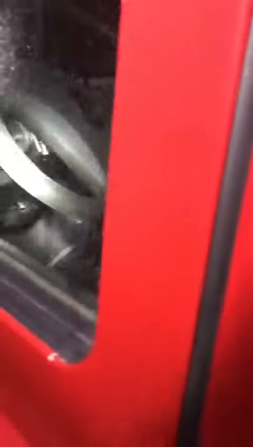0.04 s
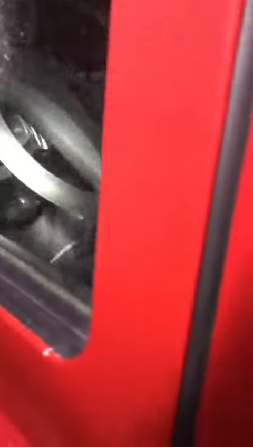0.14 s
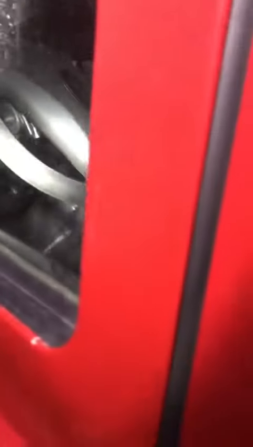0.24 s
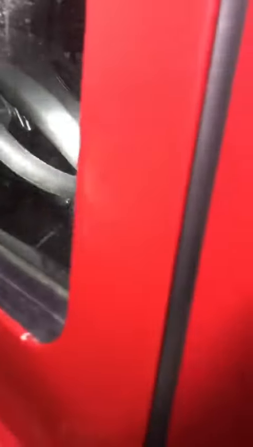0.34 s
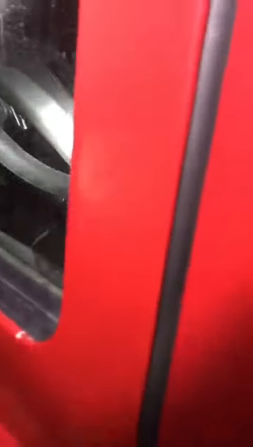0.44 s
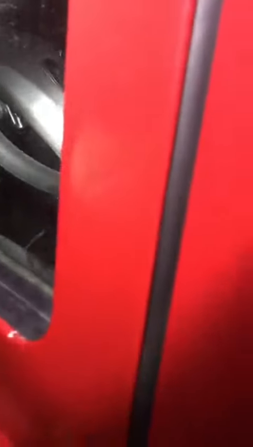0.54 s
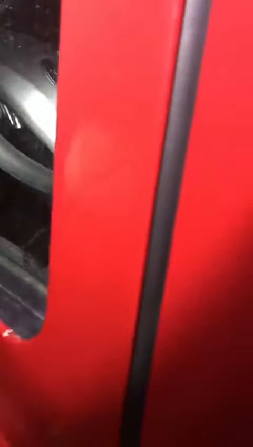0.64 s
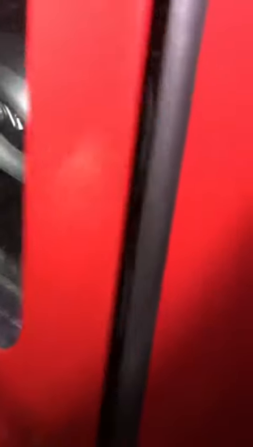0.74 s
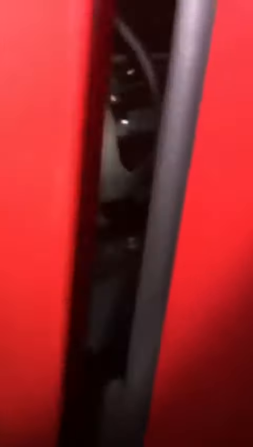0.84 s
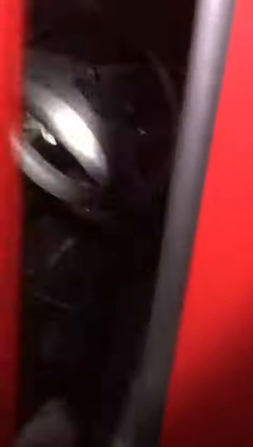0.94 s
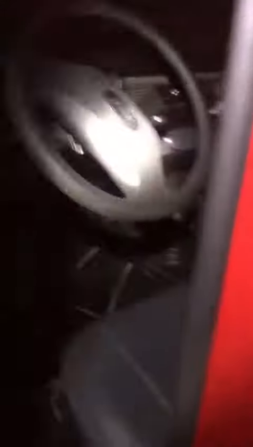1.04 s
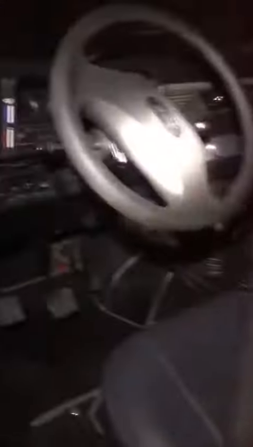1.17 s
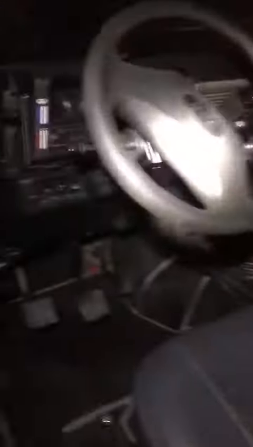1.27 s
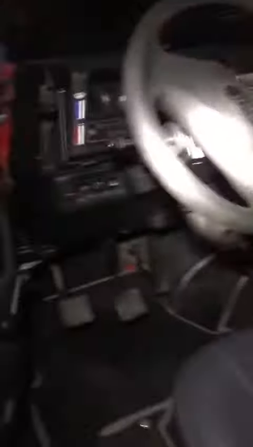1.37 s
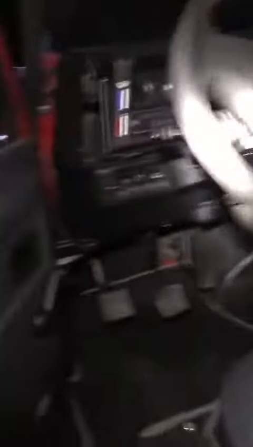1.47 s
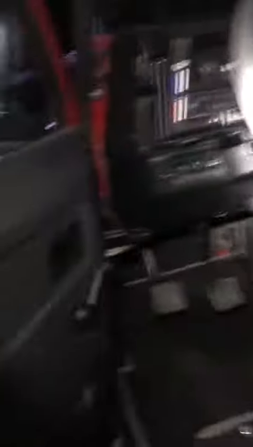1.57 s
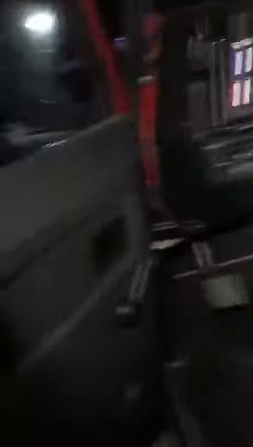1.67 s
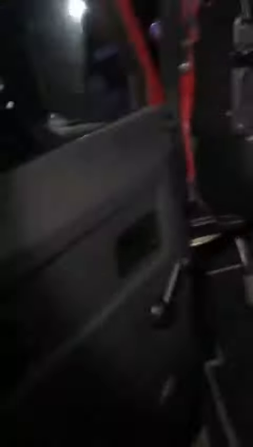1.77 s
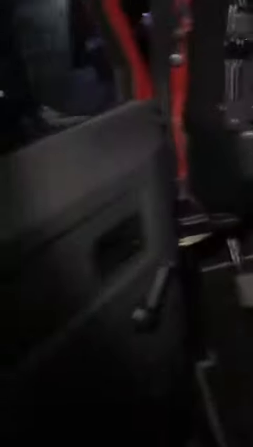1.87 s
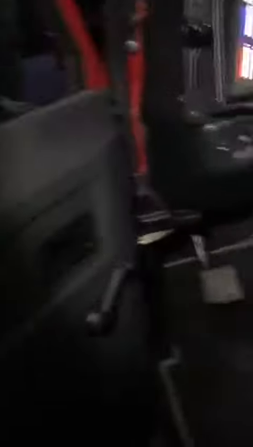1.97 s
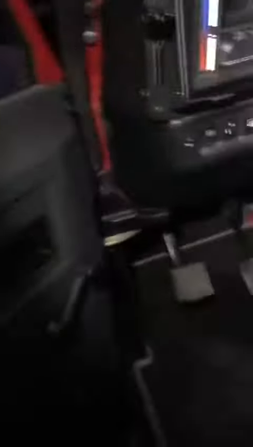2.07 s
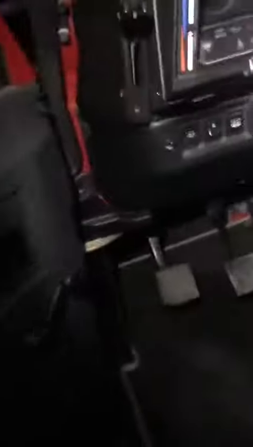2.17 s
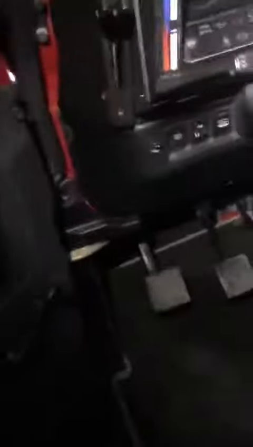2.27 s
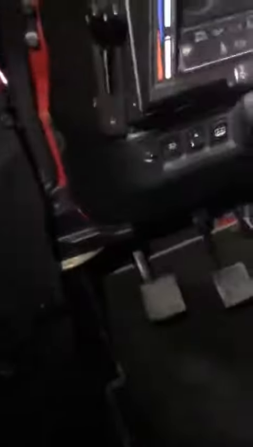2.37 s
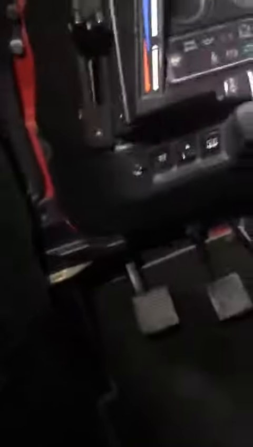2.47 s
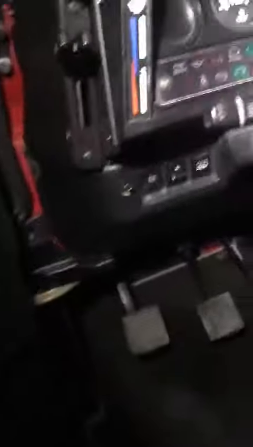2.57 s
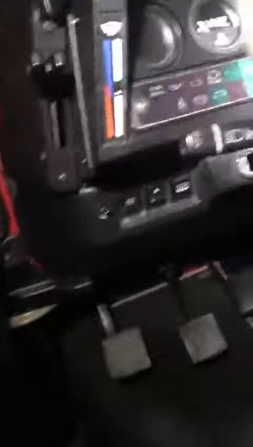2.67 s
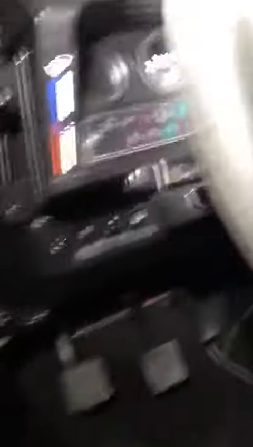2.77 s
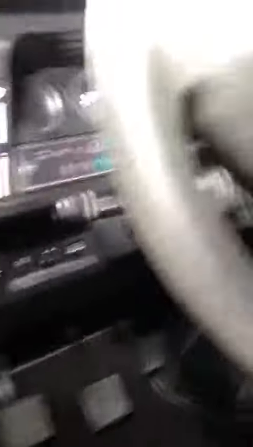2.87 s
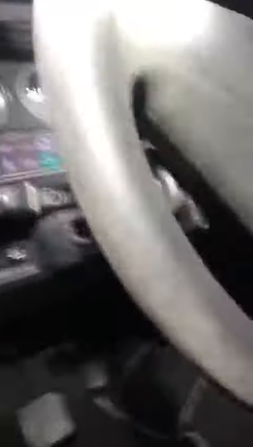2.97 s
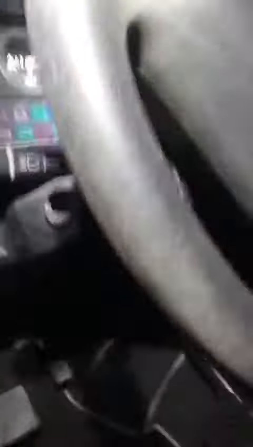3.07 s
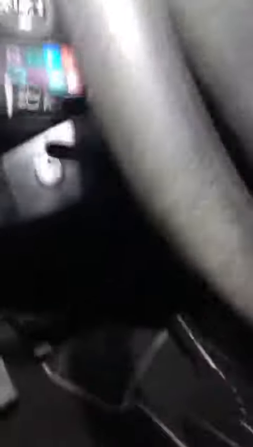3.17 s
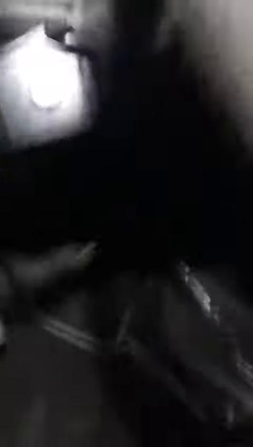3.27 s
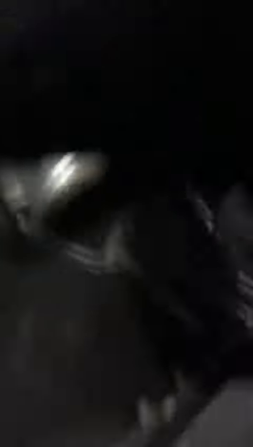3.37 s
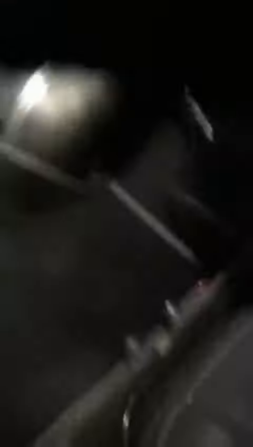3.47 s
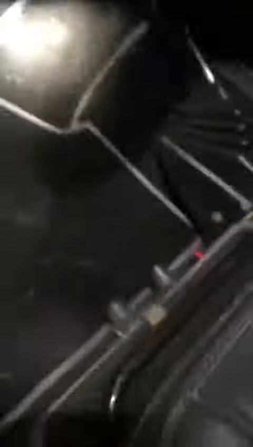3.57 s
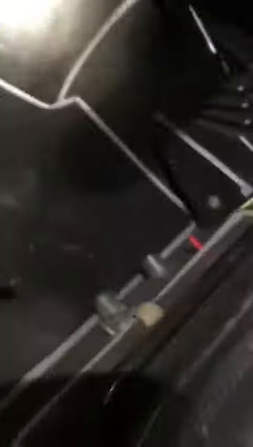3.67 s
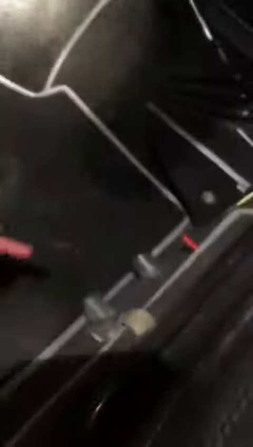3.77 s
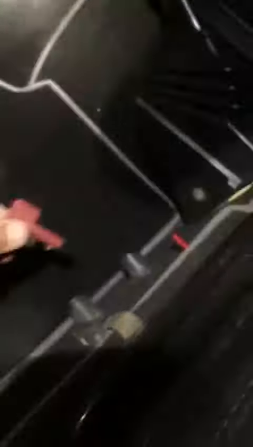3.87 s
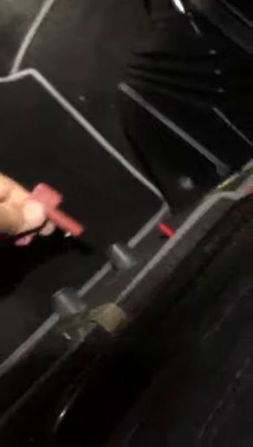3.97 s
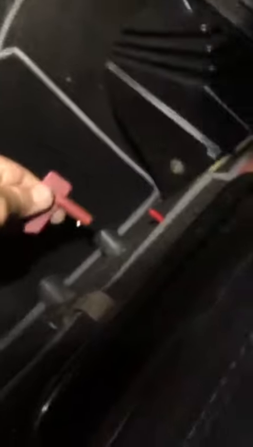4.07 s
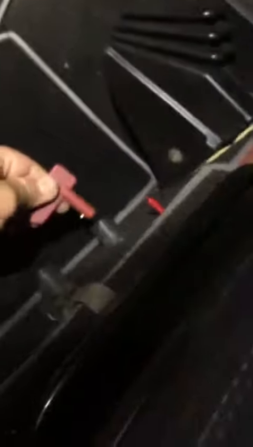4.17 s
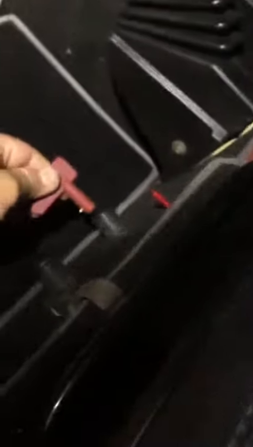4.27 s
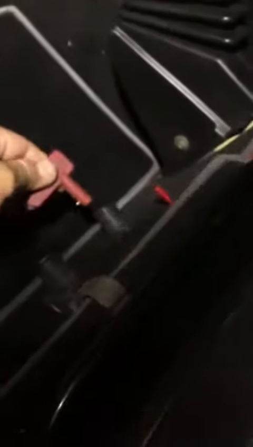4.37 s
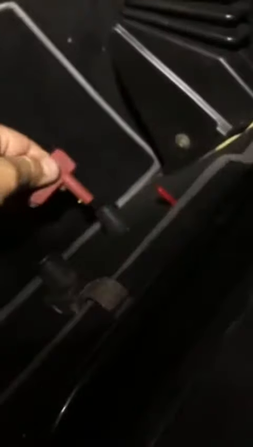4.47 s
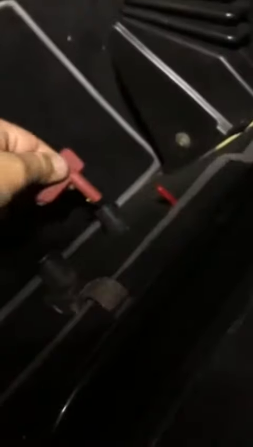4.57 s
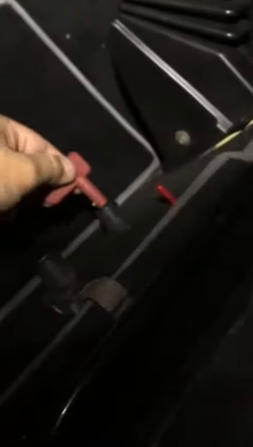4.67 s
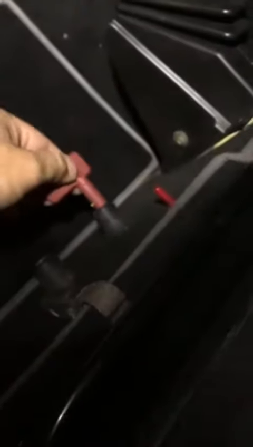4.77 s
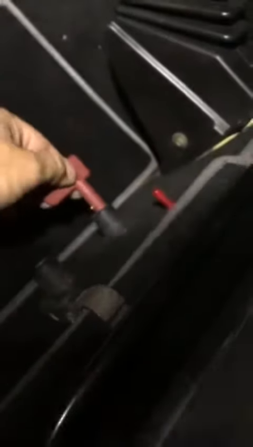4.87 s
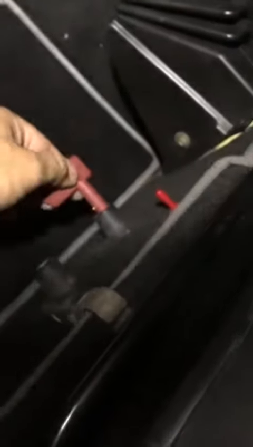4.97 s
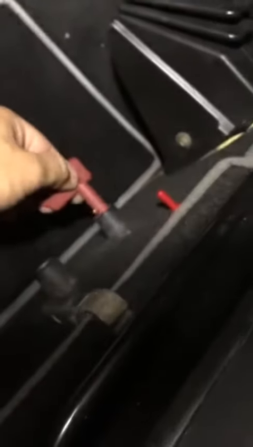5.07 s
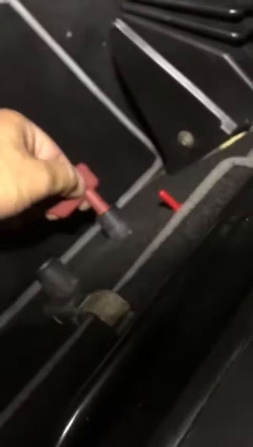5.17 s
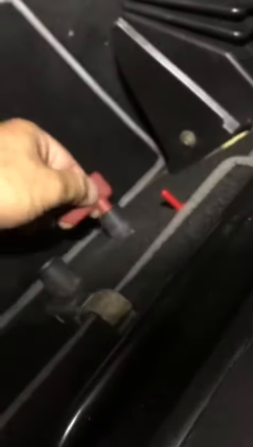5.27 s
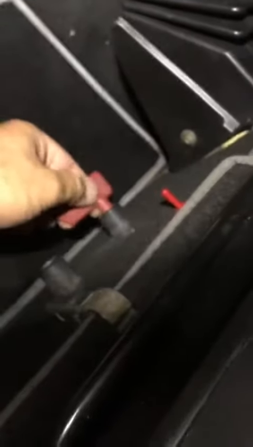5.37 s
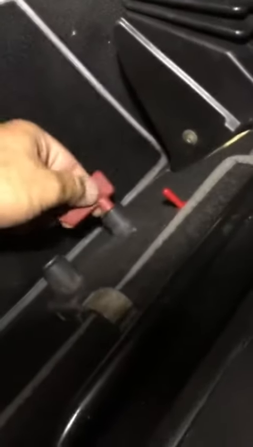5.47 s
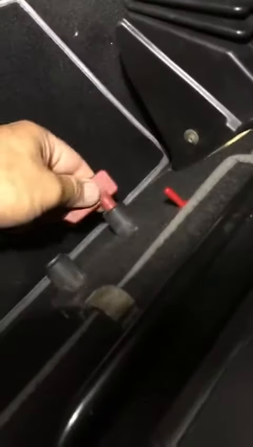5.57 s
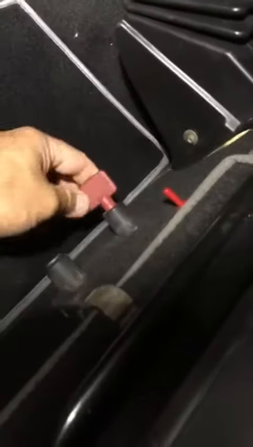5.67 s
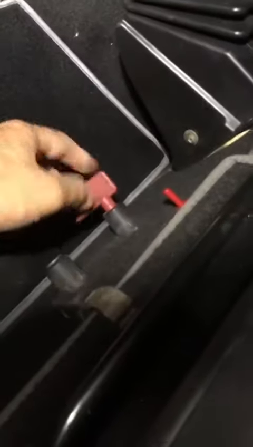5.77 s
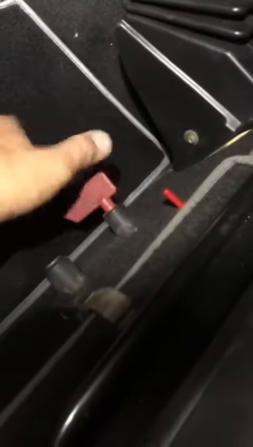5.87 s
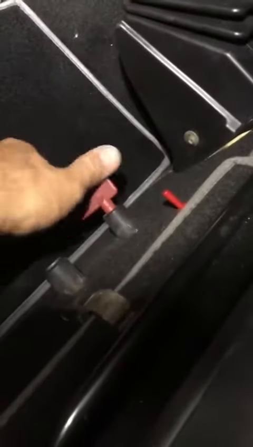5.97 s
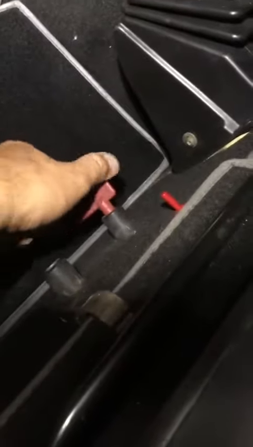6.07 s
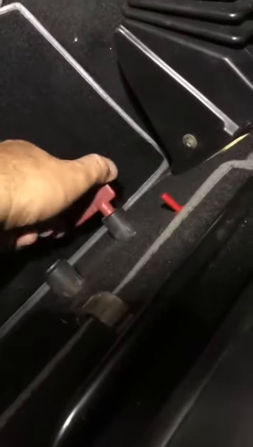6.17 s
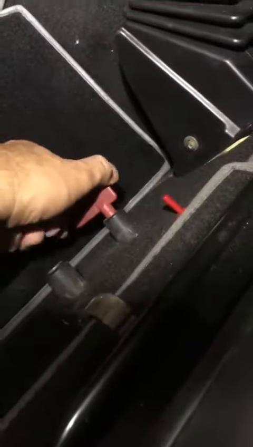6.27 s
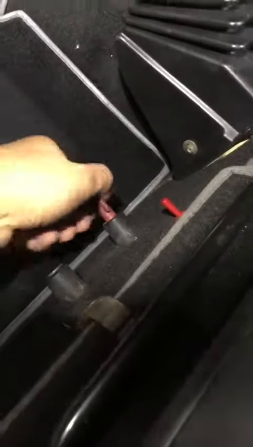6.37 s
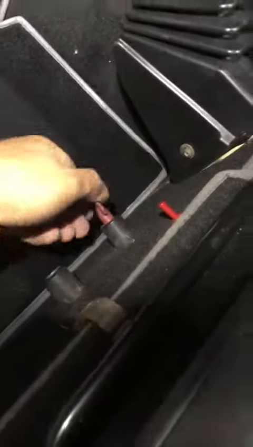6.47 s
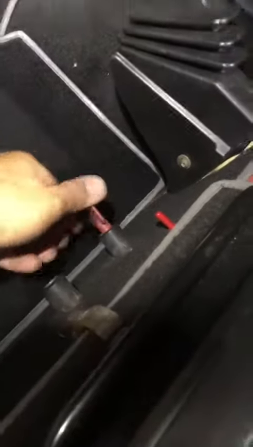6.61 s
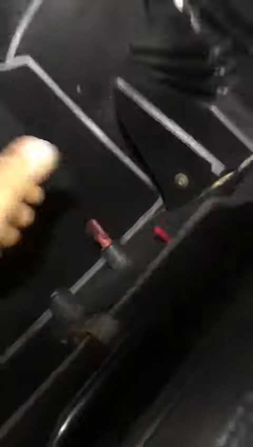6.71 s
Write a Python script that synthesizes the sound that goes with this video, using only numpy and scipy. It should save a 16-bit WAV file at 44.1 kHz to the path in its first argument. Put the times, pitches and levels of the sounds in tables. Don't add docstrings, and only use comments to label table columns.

```python
import sys
import numpy as np
from scipy import signal
from scipy.io import wavfile

SR = 44100
rng = np.random.default_rng(int(sys.argv[2]) if len(sys.argv) > 2 else 0)


def invert_db(x):
    u = np.asarray(x, float) / 20
    return 10 ** u


def to_wav(s):
    ch = np.atleast_2d(s).T
    pcm = np.round(np.clip(ch, -1, 1) * 32767)
    wavfile.write(sys.argv[1], SR, pcm.astype(np.int16))


N = 297278

EDGES = 28 * 2 ** (np.arange(28) / 3)
CENTRES = np.sqrt(EDGES[1:] * EDGES[:-1])


def rms_one(x):
    return x / np.sqrt(np.mean(x ** 2, axis=-1, keepdims=True) + 1e-20)


def at_hz(points, hz):
    f, db = np.transpose(points)
    return np.interp(np.log(hz), np.log(f), db, left=-90, right=-90)


def drift(rate_hz):
    r = np.exp(-80 * np.pi * rate_hz / SR)
    draws = rng.standard_normal(N // 40 + 2002)
    slow = signal.lfilter([1], [1, -2 * r, r * r], draws)[2000:]
    return np.interp(np.arange(N) / 40, np.arange(len(slow)), rms_one(slow))


def bands(source):
    split = []
    for k, (lo, hi) in enumerate(zip(EDGES, EDGES[1:])):
        band = signal.butter(2, [lo, hi], "band", fs=SR, output="sos")
        split.append(signal.sosfilt(band, source[k % 2]))
    return rms_one(np.array(split))


def grains(per_s, spread_db):
    sizes = invert_db(spread_db * np.minimum(rng.exponential(1, (2, N)), 5))
    signs = rng.choice([-1, 1], (2, N))
    happens = rng.random((2, N)) < per_s / SR
    return sizes * signs * happens + 1e-9


def ring(force, hz, t60):
    r = invert_db(-60 / (max(t60, .005) * SR))
    w = 2 * np.pi * hz / SR
    return signal.lfilter([0, np.sin(w)], [1, -2 * r * np.cos(w), r * r], force + 1e-18)


def add(track, s, piece):
    i = round(s * SR)
    track[..., i:i + piece.shape[-1]] += piece[..., :N - i]


def push(length_s):
    shape = np.hanning(max(round(length_s * SR), 3) + 2)
    return shape / shape.sum()


def swell(s, db, rise_db, fall_db):
    late = np.arange(N) / SR - s
    return invert_db(db + np.where(late < 0, rise_db * late, -fall_db * late)) ** 2


def layer(noise, spectrum, level_db, patchy_db):
    weight = invert_db(at_hz(spectrum, CENTRES)) * np.sqrt(CENTRES)
    flicker = [invert_db(patchy_db * drift(6.2)) for k in range(3)]
    mix = sum(w * flicker[k % 3] * band for k, (w, band) in enumerate(zip(weight, noise)))
    return invert_db(level_db) * rms_one(mix)


# (frequency [Hz], density [dB per Hz])
RUMBLE_SPECTRUM = [(15, -50), (25, -19.5), (69, -8), (108, -1.5), (176, -19.5), (195, -25.5), (321, -26.5),
                   (360, -17), (400, -23), (520, -58), (880, -120)]
# (frequency [Hz], density [dB per Hz])
TRAFFIC_SPECTRUM = [(100, -17.5), (170, 3), (216, 3.5), (399, -4.5), (936, 1), (1160, -10), (1290, -7.5),
                    (2020, -25.5), (3000, -24.5), (3900, -55.5), (6600, -120)]
# (frequency [Hz], density [dB per Hz])
TYRE_SPECTRUM = [(900, -19), (1300, 1), (1800, 1.5), (2200, -13.5), (3000, -30)]
# (frequency [Hz], density [dB per Hz])
RUSTLE_SPECTRUM = [(1060, -36.5), (1800, -4.5), (2300, -9), (5880, -10.5), (11100, -18), (12000, -23),
                   (12500, -37.5), (16200, -70), (22000, -120)]
# (time [s], traffic level [dB])
STREET_LEVEL = [(0, -52), (.25, -56), (1.3, -57), (1.6, -58.5), (2.6, -60.5), (3.0, -57), (3.45, -56),
                (3.8, -62.5), (4.5, -63.5), (5.5, -64), (6.2, -67), (6.74, -63)]
# (time [s], rustle level [dB])
RUSTLE_LEVEL = [(0, -71), (.45, -71), (0.849, -66.5), (1.16, -69.5), (1.5, -73), (1.76, -68.5), (2.27, -72),
                (2.7, -68.5), (2.97, -67.5), (3.26, -61), (3.651, -66.5), (3.94, -64), (4.13, -69.5),
                (4.56, -74), (6.381, -76), (6.74, -72.5)]
# (time of crest [s], level [dB])
CAB_ROCKINGS = [
    (.45, -54.5),
    (.9, -43.5),
    (1.25, -57),
    (3.11, -52.5),
    (3.501, -64),
    (4.13, -52),
    (5.29, -44),
    (6.45, -52),
]


def background(noise):
    t = np.arange(N) / SR
    street_db = np.interp(t, *np.transpose(STREET_LEVEL))
    rustle_db = np.interp(t, *np.transpose(RUSTLE_LEVEL))
    rocking = sum(swell(s, db, rise_db=69, fall_db=68) for s, db in CAB_ROCKINGS)
    rumble_db = 10 * np.log10(invert_db(-60.5) ** 2 + rocking)
    wash = swell(.84, -44.5, rise_db=80.5, fall_db=38)
    traffic_db = 10 * np.log10(invert_db(street_db) ** 2 + wash)
    hiss = layer(noise, RUSTLE_SPECTRUM, rustle_db, patchy_db=.6)
    rumble = layer(noise, RUMBLE_SPECTRUM, rumble_db, patchy_db=3.0)
    traffic = layer(noise, TRAFFIC_SPECTRUM, traffic_db, patchy_db=1.74)
    tyres = layer(noise, TYRE_SPECTRUM, -79.5, patchy_db=2.65)
    return rumble + traffic + tyres + hiss


# (time [s], length [s], rms level [dB])
RUBBER_STROKES = [(0.072, 0.1, -62), (0.546, 0.063, -61), (0.657, 0.044, -55.5), (0.73, 0.044, -39),
                  (0.8, 0.013, -31.5), (0.917, 0.094, -56.5), (1.026, 0.044, -58), (1.318, 0.024, -52),
                  (3.484, 0.11, -59.5), (5.211, 0.038, -65.5), (5.255, .055, -63.5)]
# (time [s], length [s], rms level [dB])
CLOTH_STROKES = [(1.695, 0.029, -60.5), (1.856, 0.058, -64.5), (1.816, 0.035, -69.5), (2.09, .05, -68.5),
                 (2.194, 0.012, -60.5), (2.496, 0.057, -49.5), (2.546, 0.032, -57), (2.744, 0.064, -55),
                 (2.867, 0.05, -64), (5.234, 0.089, -77), (5.638, 0.087, -67.5), (5.98, 0.045, -72.5),
                 (6.367, 0.05, -60), (6.522, .06, -75)]
# (time [s], length [s], rms level [dB], centre [Hz])
SOLE_DRAGS = [
    (0.12, 0.045, -54, 1100),
    (2.511, 0.041, -51.5, 843),
    (3.065, 0.2, -49.5, 328),
    (3.165, 0.083, -59, 874),
    (5.121, 0.032, -48, 1204),
    (6.381, 0.052, -57, 793),
]
# (time [s], length [s], rms level [dB], centre [Hz])
THIN_SLIDES = [
    (.11, .07, -71, 3700),
    (3.503, 0.07, -67, 2000),
    (5.22, .1, -72, 3470),
]


def scuffs(grit):
    out = np.zeros(N)
    t = np.arange(SR // 4) / SR
    rubs = [(*row, 3020, 1.5) for row in RUBBER_STROKES]
    rubs += [(*row, 5430, 1.42) for row in CLOTH_STROKES]
    rubs += [(*row, 0.86) for row in SOLE_DRAGS]
    rubs += [(*row, .3) for row in THIN_SLIDES]
    for s, length, db, hz, octaves in rubs:
        uneven_db = 2.0 * rng.standard_normal(len(CENTRES))
        colour = invert_db(-6 * (np.log2(CENTRES / hz) / octaves) ** 2 + uneven_db)
        stroke = np.minimum(t / 0.02, 1) * invert_db(-60 * np.maximum(t - length, 0) / 0.08)
        mix = colour / np.linalg.norm(colour) @ grit[:, round(s * SR):][:, :len(t)]
        add(out, s, invert_db(db) * stroke[:len(mix)] * mix)
    return invert_db(2.2 * drift(60)) * out


def cab(x):
    t = np.arange(SR // 2) / SR
    t60_s = 0.17
    tail = rng.standard_normal(len(t)) * invert_db(-60 * t / t60_s) * (t > .003)
    dull = signal.butter(2, [250, 2500], "band", fs=SR, output="sos")
    tail = signal.sosfilt(dull, tail)
    return invert_db(-22.5) * signal.fftconvolve(x, tail / np.linalg.norm(tail))[:N]


# (time [s], peak level [dB], frequency [Hz])
PAN_KNOCKS = [(0.085, -40.5, 126), (0.444, -39.5, 124), (1.074, -41, 167), (1.903, -41.5, 149),
              (2.166, -51, 129), (2.309, -42, 151.4), (4.222, -40.5, 129), (4.696, -31, 115.6),
              (5.131, -27.5, 122.3), (5.244, -27, 110.8), (5.31, -24.5, 129), (5.4, -42.5, 142.3),
              (5.683, -38, 137.2), (6.06, -46, 125.3), (6.389, -39.5, 117.2), (6.43, -38.5, 110),
              (6.557, -35, 112.8)]
# (time [s], peak level [dB], frequency [Hz])
SKIN_KNOCKS = [(0.593, -36, 254), (1.039, -35.5, 259.6), (1.14, -35.5, 228.4), (1.24, -36, 226),
               (1.287, -42, 240), (3.079, -36.5, 234), (3.147, -31.5, 267), (3.196, -34.5, 246),
               (3.231, -40.5, 214), (3.298, -38.5, 208), (3.841, -51, 256), (4.07, -38, 245.7),
               (5.725, -44.5, 281)]
# (time [s], peak level [dB], frequency [Hz])
KNUCKLE_KNOCKS = [
    (0.494, -48.5, 560),
    (2.045, -29.5, 538),
    (2.491, -48, 330),
    (2.861, -39.5, 597),
    (4.029, -34.5, 462),
]


def thuds():
    out = np.zeros(N)
    for rows, t60 in ((PAN_KNOCKS, 0.14), (SKIN_KNOCKS, 0.14), (KNUCKLE_KNOCKS, 0.028)):
        for s, db, hz in rows:
            force = np.zeros(SR // 3)
            add(force, 0, push(0.21 / hz))
            force = ring(force, hz, 2.7 / hz)
            near, high = rng.uniform([1.08, 1.7], [1.25, 2.4])
            body = ring(force, hz, t60)
            body += 0.45 * ring(force, near * hz, 1.147 * t60)
            body += .9 * ring(force, high * hz, 0.27 * t60)
            add(out, s, invert_db(db) * body / np.abs(body).max())
    return out


# (time [s], peak level at 1.5-4 kHz [dB], low part [dB rel], high part [dB rel])
DOOR_CONTACTS = [(0.2059, -54, -10, -9), (0.3905, -47.5, 5, -16), (0.4397, -62.5, 15, 11),
                 (0.4966, -32.5, -1.5, -14.5), (0.5074, -48.5, 4, -1), (0.594, -34.5, -4, -14),
                 (0.715, -6.5, -8, 2.5), (0.7217, -15.5, -9, -5), (0.745, -27.5, 5.5, -2),
                 (0.768, -28.5, -4, 3), (0.788, -12.5, -19, -9.5), (0.8, -11, -13, -19),
                 (0.8997, -62.5, -3, 17), (0.947, -37, -17, -9), (1.023, -36, -6, 9.5),
                 (1.0325, -38, 1.5, 3.5), (1.1393, -49.5, 13, 1), (1.2415, -51.5, 14.5, 0),
                 (1.3314, -42, -1, -1.5)]
# (time [s], peak level at 1.5-4 kHz [dB], low part [dB rel], high part [dB rel])
TRIM_CONTACTS = [(1.696, -58.5, 9, 1), (1.8376, -51.5, 6, -4.5), (1.907, -50.5, -17, -4),
                 (2.047, -60.5, 15, -14), (2.141, -59.5, -5, 11.5), (2.1715, -46, 2, -11.5),
                 (2.3155, -59, 13.5, -5), (2.5018, -40, -0.5, -28), (2.549, -56, 9.5, 12),
                 (2.614, -48, -29.5, -8), (2.638, -52.5, -8, 2.5), (2.8639, -50.5, 6, -1),
                 (3.1492, -47, 15, 2), (3.195, -66.5, 26, 15.5), (3.46, -47, -13, -10),
                 (3.5894, -57, -4.5, 4), (3.8367, -52.5, 3, -2), (4.0715, -56, 18, 3)]
# (time [s], peak level at 1.5-4 kHz [dB], low part [dB rel], high part [dB rel])
KEY_CONTACTS = [(4.3311, -31.5, -26.5, -24), (4.6946, -40, 11.5, -54.5), (4.9024, -64.5, 7, -9),
                (5.1296, -20.5, -2, -8.5), (5.1534, -47, 13, -11.5), (5.194, -58.5, -4, -9),
                (5.21, -57.5, -8.5, -3), (5.232, -50, -6.5, -15), (5.3043, -31, 4, -10),
                (5.3921, -59, -6, -10.5), (5.669, -48.5, -3.5, -16.5), (5.7168, -42, 0, -17.5),
                (6.382, -54, 9, -12.5)]
# (touch length [s], t60 [s], log t60 gain [per dB of low part])
STEEL_ANSWER = (.0028, .038, .01)
TRIM_ANSWER = (0.0022, 0.054, 0.025)
KEY_ANSWER = (0.0016, 0.035, 0.012)


def ticks(noise):
    out = np.zeros(N)
    t = np.arange(SR // 6) / SR
    onset = np.sin(np.pi / 2 * np.minimum(t * CENTRES[:, None] / 0.58, 1)) ** 2
    crack = onset * (1 + 0.71 * np.exp(-t / 0.0011))
    groups = ((DOOR_CONTACTS, STEEL_ANSWER), (TRIM_CONTACTS, TRIM_ANSWER), (KEY_CONTACTS, KEY_ANSWER))
    for rows, (hold, t60, per_db) in groups:
        for s, db, low_db, high_db in rows:
            spectrum = [(300, low_db + 0.5), (870, low_db), (2450, 0.0022),
                        (6600, high_db), (13000, high_db - 9.0)]
            colour = at_hz(spectrum, CENTRES) + rng.normal(0, 1.5, len(CENTRES))
            lasts = t60 * np.exp(per_db * low_db) * (CENTRES / 2450) ** -0.46
            fall = -60 * np.maximum(t - hold, 0) / lasts[:, None]
            gain = invert_db(db - 14 + colour[:, None] + fall) * crack
            add(out, s, np.sum(gain * noise[:, round(s * SR):][:, :len(t)], axis=0))
    return out


# (time [s], peak level [dB], frequency [Hz])
HANDLE_PARTS = [
    (0.207, -57, 3600),
    (0.4967, -34, 1700),
    (.594, -46, 3680),
    (.7866, -22, 7060),
    (1.333, -44, 3060),
]
# (time [s], peak level [dB], frequency [Hz])
TRIM_PARTS = [
    (2.045, -41, 1000),
    (2.047, -40.5, 300),
    (2.315, -46, 420),
    (2.504, -43, 2050),
    (2.615, -47, 2606),
    (2.864, -48, 2900),
    (3.51, -54, 2000),
    (3.587, -47, 1970),
    (3.588, -50, 4000),
    (6.4, -48.5, 340),
]
# (time [s], peak level [dB], frequency [Hz])
KEY_PARTS = [(4.3313, -39, 3500), (4.3315, -41, 2050), (4.693, -41, 1780), (4.6932, -43, 2600),
             (4.695, -40, 596), (4.9, -54, 1150), (5.1295, -21.5, 1074), (5.1297, -24, 3530),
             (5.1314, -27, 2050), (5.305, -38, 990), (5.306, -44, 3500), (5.67, -48, 1620),
             (5.719, -51, 1600)]
# (frequency [Hz], peak level [dB], t60 [s])
LATCH_SPRING = [(4580, -35, 0.14), (7300, -38, 0.0967), (7730, -40, 0.15), (3350, -38.5, .1)]


def rings():
    out = np.zeros(N)
    t = np.arange(SR // 8) / SR
    rows = []
    for s, db, hz in HANDLE_PARTS + TRIM_PARTS + KEY_PARTS:
        rows.append((s, db, hz, .022 * (hz / 2000) ** -.45))
    for hz, db, t60 in LATCH_SPRING:
        rows.append((.802, db, hz, t60))
    for s, db, hz, t60 in rows:
        scratch = rng.standard_normal(len(t)) * np.exp(-t / .002)
        tone = ring(scratch, hz, t60)
        add(out, s, invert_db(db) * tone / np.abs(tone).max())
    return out


# (frequency [Hz], level [dB], t60 [s])
DOOR_MODES = [(50, -10.5, 0.41), (86, -24.5, .4), (129, -16, 0.45), (165, -25.5, 0.14), (211, -2, 0.12),
              (231.8, 2.5, 0.25), (260, -9.5, 0.11), (317, -23, .15), (340.7, -17, 0.46), (403, -18, 0.05),
              (470, -24, .16), (574.8, -16, 0.065), (650, -20.5, 0.16), (775, -25.5, 0.084)]
# (time [s], level [dB], push length [s], tilt [dB per octave])
DOOR_JOLTS = [
    (.7195, -5, 0.0023, 0.8),
    (0.7445, -7.5, 0.0047, -4),
    (0.764, -19, 0.0038, 1.8),
    (0.802, -18.5, 0.0022, 17.5),
    (.83, -19, 0.0023, -5.5),
    (0.898, -25.5, 0.0064, 4),
]
# (frequency [Hz], level [dB], t60 [s])
LATCH_MODES = [(1620, -4.5, .012), (2270, 2, 0.0034), (3760, -5, 0.016), (4200, -2, 0.0051),
               (4565, -0.5, 0.024), (6130, -14, 0.017), (7400, -8, 0.025), (8020, -7, 0.013)]
# (time [s], level [dB], chatter t60 [s])
LATCH_SNAPS = [
    (0.7871, -44, .03),
    (0.8007, -29.5, 0.025),
    (.806, -65.5, 0.24),
    (0.8993, -63.5, 0.017),
]


def door():
    length = N // 3
    force = np.zeros((len(DOOR_MODES), length))
    snaps = np.zeros((len(LATCH_MODES), length))
    octaves = np.log2(np.array(DOOR_MODES)[:, :1] / 230)
    for s, db, push_s, tilt_db in DOOR_JOLTS:
        add(force, s, -invert_db(db + tilt_db * octaves) * push(push_s))
    t = np.arange(SR // 4) / SR
    for s, db, t60 in LATCH_SNAPS:
        chatter = rng.standard_normal((len(LATCH_MODES), len(t)))
        add(snaps, s, invert_db(db - 60 * t / t60) * chatter)
    skin = sum(invert_db(db) * ring(jolt, hz, t60) for jolt, (hz, db, t60) in zip(force, DOOR_MODES))
    steel = sum(invert_db(db) * ring(hit, hz, t60) for hit, (hz, db, t60) in zip(snaps, LATCH_MODES))
    return np.pad(skin + steel, (0, N - length))


# (time [s], length [s], level [dB], frequency [Hz])
KEY_SQUEAK = (5.395, .065, -54, 550)


def squeak():
    out = np.zeros(N)
    s, length, db, hz = KEY_SQUEAK
    t = np.arange(round(length * SR)) / SR
    add(out, s, invert_db(db) * np.sqrt(np.hanning(len(t))) * np.sin(2 * np.pi * hz * t))
    return out


def scene():
    noise = bands(rng.standard_normal((2, N)))
    grit = bands(grains(per_s=5000, spread_db=3.0))
    near = scuffs(grit[:, ::-1]) + thuds() + ticks(noise[:, ::-1]) + rings() + door() + squeak()
    near = signal.sosfilt(signal.butter(3, 110, "high", fs=SR, output="sos"), near)
    return (near + cab(near) + background(noise))[None, :]


def band_limit(x):
    return signal.sosfilt(signal.butter(12, 13110, fs=SR, output="sos"), x)


def record(dry):
    rounded = 1.224 * np.tanh(dry / 1.248)
    top_cut = signal.cheby2(10, 50, 13100, fs=SR, output="sos")
    return band_limit(signal.sosfilt(top_cut, rounded))


dry = scene()
out = record(dry)
to_wav(out)
```